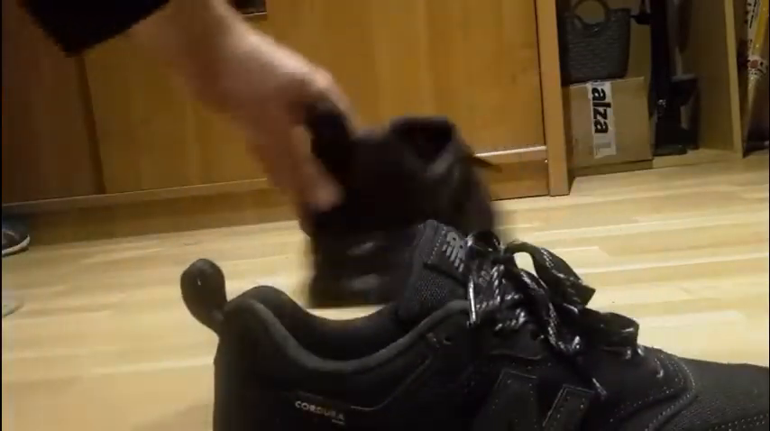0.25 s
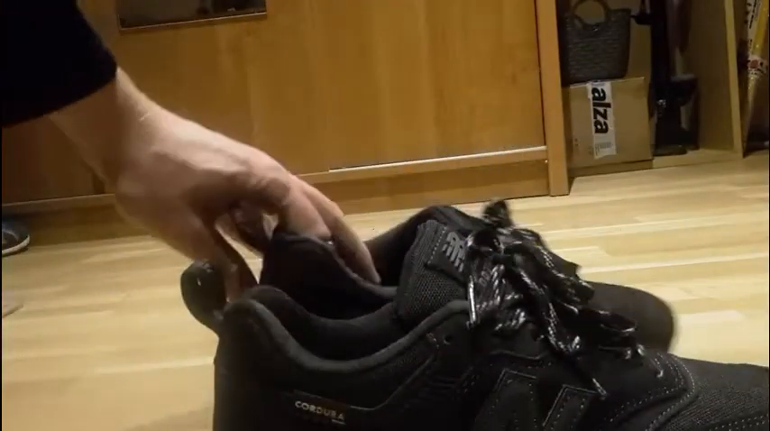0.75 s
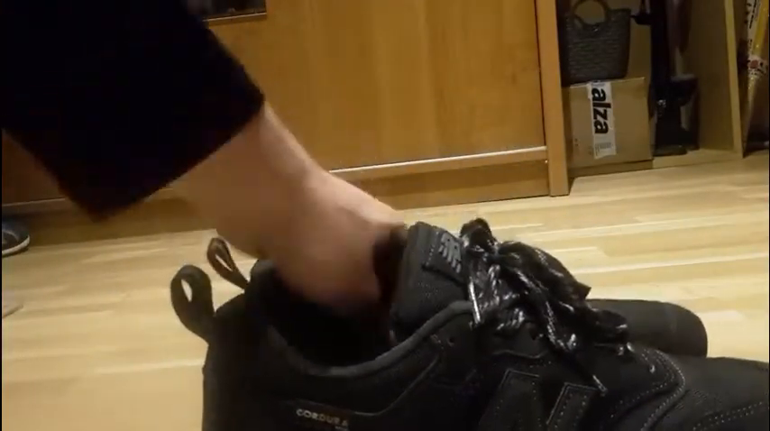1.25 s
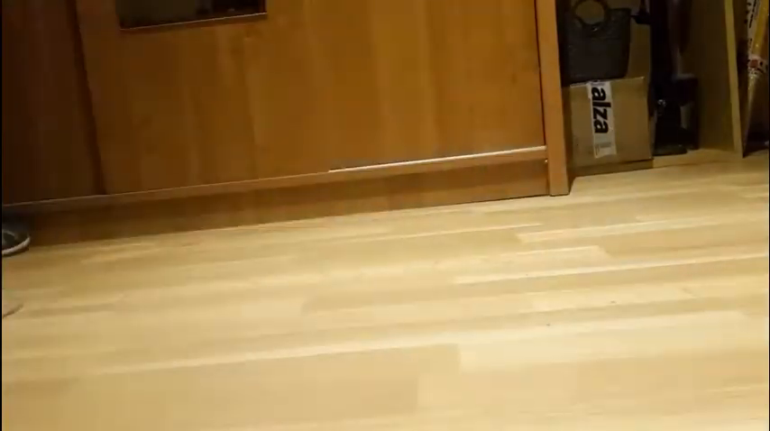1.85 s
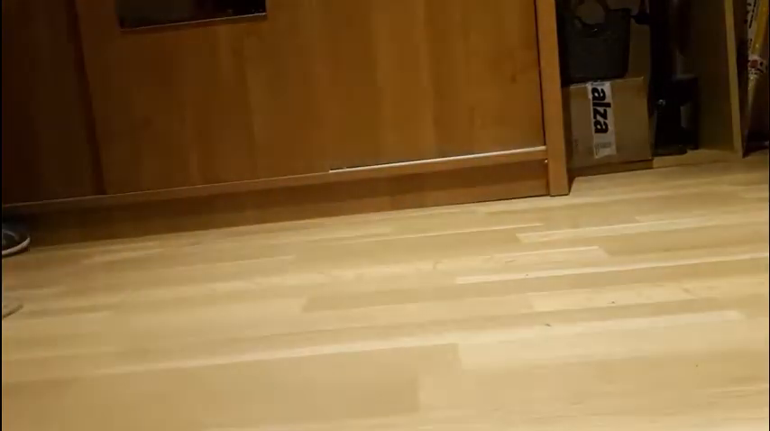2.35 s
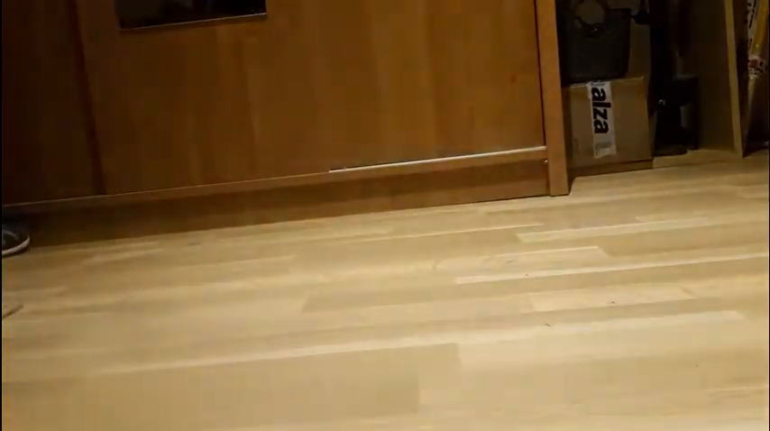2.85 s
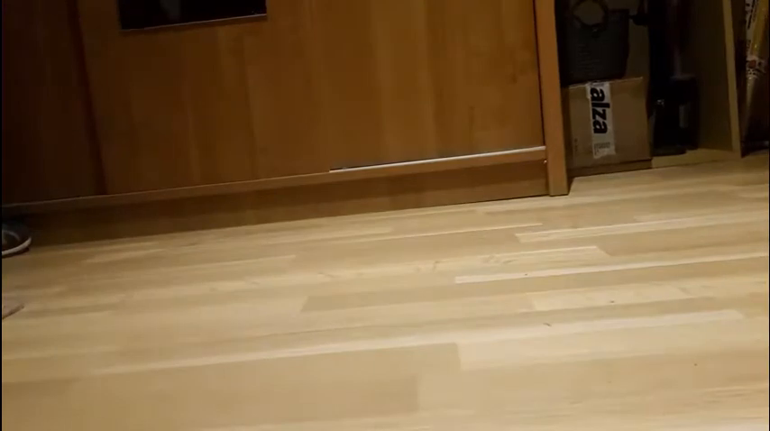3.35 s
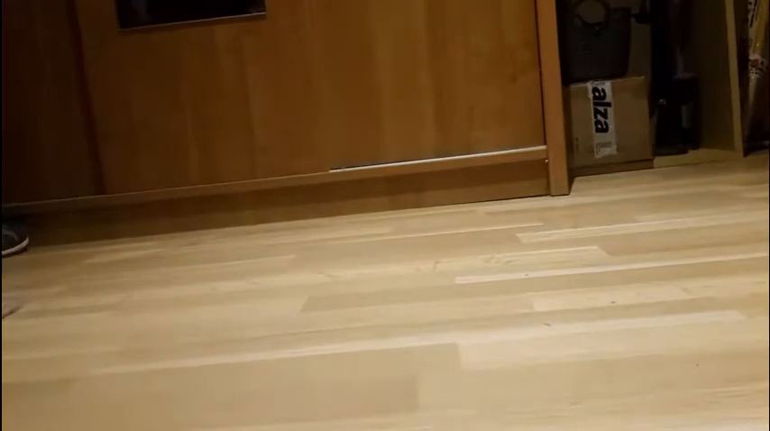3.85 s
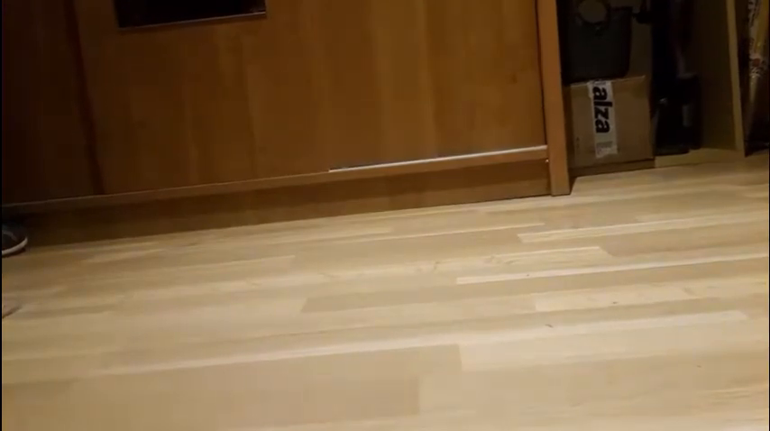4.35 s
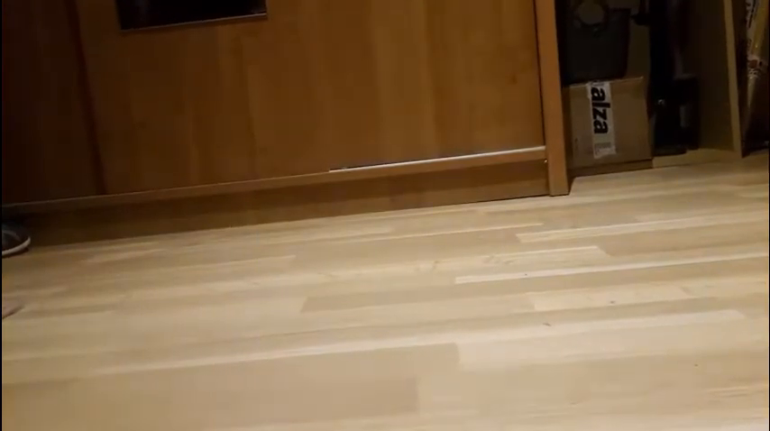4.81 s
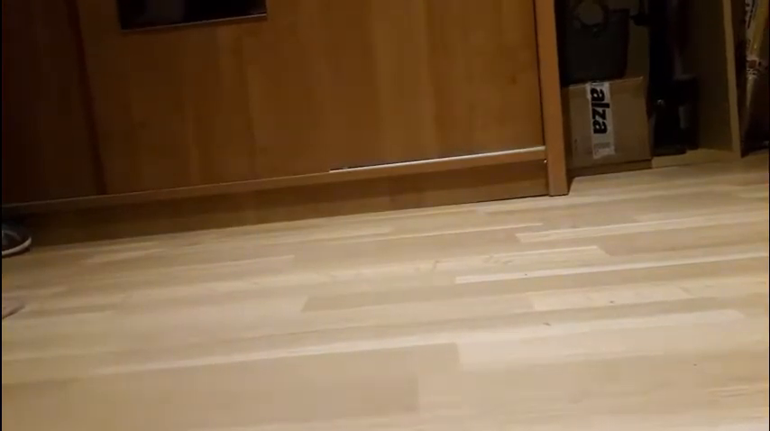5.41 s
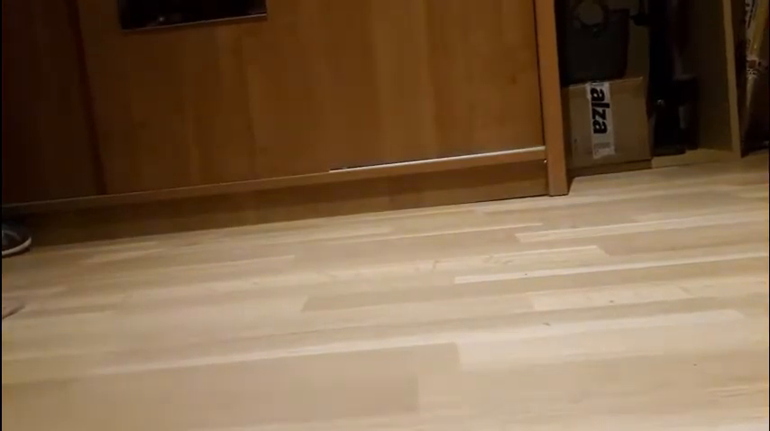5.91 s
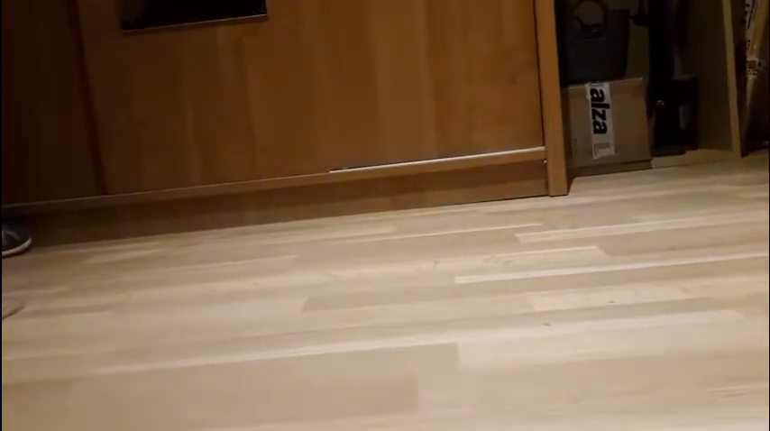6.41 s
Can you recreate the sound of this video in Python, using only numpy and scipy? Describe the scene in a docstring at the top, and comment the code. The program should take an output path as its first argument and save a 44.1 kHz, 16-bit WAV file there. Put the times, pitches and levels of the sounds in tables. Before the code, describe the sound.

In a small quiet wooden-floored room, a rubber-soled shoe is set down close to the microphones with dull knocks and short scuffs. Light fabric rubbing and tiny lace-tip ticks follow. Then a loud cluster of hard thuds lands on the boards to the left, with a few softer steps after it, clothes brushing, and a faint steady hiss underneath.

```python
"""In a small quiet room with a wooden floor, a shoe is set down in front and rocks on its sole.
Then blows and steps thud on the boards to the left; soles drag, cloth rustles and lace tips tick.
Knocks are dull pulses that ring the sole or the boards; scuffs, cloth and cracks are shaped noise.
The floor hums and shudders, reflections follow, and a close microphone pair adds a faint hiss."""
import sys
import numpy as np
from scipy import signal
from scipy.fft import rfft, irfft, next_fast_len
from scipy.io import wavfile
from scipy.ndimage import uniform_filter1d

SR = 44100
rng = np.random.default_rng(int(sys.argv[2]) if len(sys.argv) > 2 else 0)


def wav_record(signal):
    """Record a signal, one row per channel, as 16-bit PCM in the file named by sys.argv[1]."""
    frames = np.transpose(np.atleast_2d(signal))
    bounded = np.clip(frames, -1, 1)
    # unit amplitude maps onto the largest positive 16-bit level
    quanta = np.round(bounded * 32767).astype(np.int16)
    wavfile.write(sys.argv[1], SR, quanta)


N = 294191
TIME = np.arange(N) / SR   # seconds

# In all tables, left-right level is left minus right.
# Rubber sole touching the floor in front:
# (t/s, body peak level/dB, low edge f/Hz, top edge f/Hz, ring level re pulse/dB, crack level re body/dB)
SOLE_KNOCKS = [(0.5922, -13, 201, 815, -4, -20.5), (0.6568, -22.5, 207, 636, -13, -28),
               (0.7550, -37.5, 228, 554, -36, -28), (0.964, -38.5, 150, 560, -6, -24),
               (1.0722, -27.5, 350, 960, -24, -36), (1.0738, -17.5, 143, 400, -16, -34),
               (1.0935, -6, 230, 950, 11, -21.5), (1.2034, -11, 175, 653, -2, -25.5),
               (1.592, -43, 250, 684, -2, -26), (1.703, -37, 400, 1060, -8, -11),
               (1.961, -44.5, 700, 1700, -20, -19), (2.026, -41.5, 215, 540, -28, -19)]
# Heel and sole hitting the boards to the left in quick succession; same columns
BOARD_KNOCKS = [(2.8060, -5, 428, 1440, 8, -24), (2.8092, -7, 195, 420, 7, -26),
                (2.8118, -4.5, 252, 906, -15, -27.5), (2.8155, -24, 140, 420, 8, -37),
                (2.9135, -17.5, 337, 1070, -36, -19.5), (2.9174, -19.5, 340, 490, -4, -43),
                (3.5785, -26.5, 226, 1090, -6, -17), (3.5845, -27, 217, 484, 16, -19),
                (4.3310, -18, 586, 1350, -26, -21), (4.3335, -21, 516, 707, -11, -32),
                (4.6185, -31.5, 180, 463, 1, -17), (4.633, -37, 200, 820, 6, -23),
                (5.497, -41.5, 340, 456, 26, -32), (5.535, -48, 340, 470, 7, -29)]
# Ways the sole and the boards vibrate: (f/Hz, level/dB, t60/s)
SOLE_RESONANCES = [(246, 2.5, 0.026), (499, 8, 0.044), (710, -9, 0.039), (933, 7.5, 0.024)]
BOARD_RESONANCES = [(172.2, -11, 0.59), (268, 6.5, 0.029), (398, 8.5, 0.041), (490, -20, 0.017),
                    (580, 10.5, 0.027), (752, 17.5, 0.04), (1162, 8.5, 0.047)]
# Colour of the brief crack at contact: (f/Hz, level/dB)
CRACK_COLOUR = [(300, 10.5), (1200, 6), (3000, -2.5), (5500, -13.5), (7500, -17.5), (11000, -18),
                (16000, -22)]
# The two microphone ports colour the treble differently: (f/Hz, left-right level/dB)
TREBLE_BALANCE = [(1000, -2), (3000, -2), (5700, -8), (8000, 3.5), (12000, 1)]
# Soles rolling and dragging: (t/s, level before swell/dB, centre f/Hz, time to swell/s, left-right level/dB)
SOLE_SCUFFS = [(0.099, -59, 520, 0.0073, 4), (0.214, -56.5, 550, 0.0083, 4), (0.891, -54.5, 477, 0.012, 4),
               (1.056, -42, 505, .008, -2), (1.114, -37, 613, 0.0034, -4), (1.245, -38, 413, 0.0057, -4),
               (1.274, -41.5, 432, 0.0055, 5), (1.414, -54.5, 396, 0.0038, -2),
               (1.514, -49, 540, 0.0069, 1), (1.917, -59.5, 664, 0.019, -1), (1.957, -55, 1110, 0.0046, 12),
               (2.849, -32.5, 744, 0.0065, -11), (3.059, -44.5, 438, 0.0086, 4.5),
               (4.318, -52.5, 734, .01, 7), (4.345, -42.5, 680, 0.018, 1), (4.452, -49, 600, 0.0081, 6),
               (4.651, -51, 556, 0.005, -7), (4.778, -57, 455, 0.0075, -2), (4.971, -57.5, 430, 0.015, 0),
               (5.825, -54.5, 510, 0.013, 2)]
# Weight coming onto the floor: (t/s, peak level before panning/dB, time of push/s)
WEIGHT_SHIFTS = [(2.811, -40, 0.0042), (3.584, -43.5, 0.023), (3.8004, -32.5, 0.0069),
                 (3.819, -34.5, 0.0048)]
# Hum of the hollow floor: (f/Hz, level/dB, t60/s)
FLOOR_RESONANCES = [(177, 8.5, 0.23), (270, -14.5, 0.26), (383, -5, 0.11), (750, -19, 0.27)]
# Landings that shake the whole floor: (t/s, peak level before panning/dB, top edge f/Hz)
FLOOR_LANDINGS = [(1.096, -41, 200), (2.815, -30.5, 80), (3.068, -45, 165), (3.587, -38, 262),
                  (4.622, -47, 200)]
# Deep vibrations of the joists: (f/Hz, level/dB, t60/s)
JOIST_RESONANCES = [(31.8, 2, 0.031), (59.4, -5, 0.14), (87, -0.5, 0.28)]
# Lace tips: (t/s, ring peak level before panning/dB, left-right level/dB, snap level/dB)
TIP_TICKS = [(1.501, -51, -8, -59), (1.5324, -50, 0, -55), (1.9385, -60, 5, -55), (2.2245, -47, -4, -56),
             (2.2645, -39.5, -2, -50), (2.2724, -33.5, -4, -42), (2.558, -55, -5, -51),
             (3.341, -39.5, -13, -55), (3.4755, -53, -7.5, -58), (6.321, -48, -13, -59),
             (6.349, -38, -8, -58)]
# High ringing of a lace tip: (f/Hz, level/dB, t60/s)
TIP_RESONANCES = [(4040, -27.5, 0.0027), (5500, -22, 0.0043), (7200, -51, 0.0017)]
# The hand sliding over the shoe's upper: (t at mid-stroke/s, level before fabric gain/dB, length/s)
HAND_MOVES = [(0.34, -76, 0.15), (0.91, -72, 0.14), (1.085, -60.5, 0.1), (1.245, -58, 0.18),
              (1.5, -63.5, 0.1), (1.62, -73, 0.18), (1.97, -64, 0.089), (2.28, -69, 0.18)]
# Clothes brushing as the legs move; same columns
LEG_MOVES = [(3.39, -67, 0.41), (4.43, -59, 0.18), (4.67, -60.5, 0.15), (5.18, -66.5, 0.29),
             (5.555, -59, 0.12), (5.91, -62.5, 0.26), (6.33, -64.5, 0.19), (6.49, -64.5, 0.1)]
# Fabric shaken by a landing: (t/s, level before attack and fabric gain/dB)
SHAKES = [(0.61, -62), (2.807, -53.5), (2.915, -54.5), (3.578, -55), (3.805, -61.5)]
# Rubbing colour of the shoe's upper and of the clothes: (f/Hz, level/dB)
UPPER_COLOUR = [(100, 6.5), (450, 9.5), (1300, 5), (2500, 1), (4000, 1.5), (5800, -3.5), (7200, -12),
                (15000, -7.5)]
CLOTHES_COLOUR = [(100, 2), (450, 11), (1200, 6.5), (2500, 5), (4300, 2.5), (5700, 1.5), (7200, -7),
                  (11000, -1.5), (15000, -4)]
# Narrow treble resonance of the microphone, heard as a high zip on the rubbing: (f/Hz, level/dB, t60/s)
MIC_RESONANCES = [(1380, -29, 0.011), (3800, -20, 0.0076), (5950, 7, 0.0028)]
# Loudness of the reflections in each region: (f/Hz, level/dB)
ECHO_COLOUR = [(40, -45), (100, 11.5), (200, 3.5), (300, 0), (500, -0.5), (900, -2), (1600, 3), (5000, 3.5),
               (15000, -10)]
# How alike the reflections are on both sides: (f/Hz, likeness from -1 to 1)
ECHO_LIKENESS = [(100, 0.27), (400, 0.69), (900, 0.32), (1600, 0), (15000, 0.29)]
# How long the reflections last: (f/Hz, t60/s)
ECHO_T60 = [(60, 0.99), (170, 0.27), (500, 0.3), (1000, 0.26), (3000, 0.47), (12000, 0.069)]
# Colour of the steady air and hiss: (f/Hz, level/dB)
AIR_COLOUR = [(15, -57), (25, -44), (48, -10), (119, -1.5), (289, -4.5), (331, -4), (482, -5.5), (523, -5),
              (631, -5), (741, -5.5), (804, -5), (1300, -10.5), (6550, -22), (11800, -18), (15500, -18.5)]
# How alike that air is on both sides: (f/Hz, likeness from -1 to 1)
AIR_ALIKE = [(60, -0.03), (150, 0.036), (380, -0.032), (950, -0.083), (2380, 0.28), (5980, -0.44),
             (15000, 0.07)]
# Which side of the air is louder: (f/Hz, left-right level/dB)
AIR_SIDES = [(60, 0), (150, -11.5), (380, -10.5), (950, -8), (2380, -17.5), (5980, -7.5), (15000, -4.5)]

# seconds by which the left port leads: the shoe is slightly to the right, the boards to the left
SHOE_LEAD_S, BOARDS_LEAD_S = -0.00027, 0.00027
SETTLE_ATTACK_S, SETTLE_T60_S = 0.0097, 0.73
ROOM_BUILD_S = 0.006
AIR_DB = -55   # rms level
CUTOFF_HZ = 15650


def from_db(db):
    """Turn decibels into a plain multiplier."""
    return 10 ** (np.asarray(db) / 20)


def rms_one(x):
    """Scale a sound to an rms of 1."""
    return x / np.sqrt(np.mean(x ** 2) + 1e-20)


def peak_one(x):
    """Scale a sound to a peak of 1."""
    return x / (np.abs(x).max() + 1e-20)


def at_hz(points, hz):
    """Read a table between its points, on a log-frequency axis."""
    table = np.array(points)
    return np.interp(np.log(np.maximum(hz, 1)), np.log(table[:, 0]), table[:, 1])


def cut(x, hz, kind, order):
    """Keep the lows ("low") or the highs ("high") of a sound."""
    edge_hz = np.clip(hz, 10, 0.45 * SR)
    return signal.sosfilt(signal.butter(order, edge_hz, kind, fs=SR, output="sos"), x)


def add(track, s, sound):
    """Mix a sound in at a moment."""
    start = max(round(s * SR), 0)
    track[start:start + len(sound)] += sound[:N - start]


def ring(push, modes):
    """A push sets off vibrations that each die away at their own pace."""
    t = TIME[:SR // 2]
    response = sum(from_db(db - 60 * t / t60) * np.cos(2 * np.pi * hz * t) for hz, db, t60 in modes)
    return signal.oaconvolve(push, response)[:len(push)]


def noise(spectrum, size, likeness=((1, 0),), balance=((1, 0),)):
    """Stereo noise with a colour, a left-right likeness and a balance; rms 1."""
    padded = next_fast_len(size)
    hz = np.fft.rfftfreq(padded, 1 / SR)
    mid, side = rfft(rng.standard_normal((2, padded)))
    alike = np.clip(at_hz(likeness, hz), -1, 1)
    sides = np.array([[1], [-1]])
    # more of the shared part makes left and right more alike
    pair = np.sqrt(1 + alike) * mid + sides * np.sqrt(1 - alike) * side
    gain = from_db(at_hz(spectrum, hz) + sides * at_hz(balance, hz) / 2)
    return rms_one(irfft(pair * gain, padded)[:, :size])


def knocks(rows, modes, lead_s, crack_t60):
    """A soft contact pushes out one dull pulse, rings the body and gives a brief crack."""
    out, size = np.zeros((2, N)), SR // 2
    for s, db, low_hz, top_hz, ring_db, crack_db in rows:
        # a softer contact has a lower top edge
        push = cut(signal.unit_impulse(size) + 1e-18, top_hz, "low", order=7)
        # slow pressure leaks round a small contact patch
        pulse = peak_one(cut(push, low_hz, "high", order=2))
        body = -peak_one(pulse + from_db(ring_db) * peak_one(ring(pulse, modes)))
        fade = from_db(crack_db - 60 * TIME[:size] / crack_t60)
        crack = fade * noise(CRACK_COLOUR, size, balance=TREBLE_BALANCE)
        add(out[0], s - lead_s / 2, from_db(db) * (body + crack[0]))
        add(out[1], s + lead_s / 2, from_db(db) * (body + crack[1]))
    return out


def scuffs(spread):
    """Tread blocks touch one after another, merging into a short dull swell."""
    out, size = np.zeros((2, N)), SR // 4
    for s, db, hz, swell_s, pan_db in SOLE_SCUFFS:
        dull = cut(rng.standard_normal(size), hz * spread, "low", order=4)
        tread = rms_one(cut(dull, hz / spread, "high", order=2))
        age = TIME[:size] / swell_s
        swell = age * np.exp(1 - age)   # fullest at age 1
        for channel, side in enumerate((1, -1)):
            add(out[channel], s, from_db(db + side * pan_db / 2) * tread * swell)
    return out


def floor_boom(pan_db):
    """Weight comes on gradually, so the hollow floor swells and then hums out."""
    out, size = np.zeros(N), SR
    hum = ring(signal.unit_impulse(size), FLOOR_RESONANCES)
    for s, db, push_s in WEIGHT_SHIFTS:
        swell = 1 - np.exp(-2 * TIME[:size] / push_s)
        add(out, s, from_db(db) * peak_one(hum * swell))
    return out * from_db([[pan_db / 2], [-pan_db / 2]])


def floor_thuds(pan_db):
    """A softened push sets the joists into a deep, quickly damped shudder."""
    out = np.zeros(N)
    for s, db, top_hz in FLOOR_LANDINGS:
        push = cut(signal.unit_impulse(SR) + 1e-18, top_hz, "low", order=2)
        add(out, s, from_db(db) * peak_one(ring(push, JOIST_RESONANCES)))
    return out * from_db([[pan_db / 2], [-pan_db / 2]])


def lace_ticks(scuff_t60):
    """Each hard tip scuffs for an instant, which gives a high ring and a thin snap."""
    out, size = np.zeros((2, N)), SR // 20
    for s, db, pan_db, snap_db in TIP_TICKS:
        fade = from_db(-60 * TIME[:size] / scuff_t60)
        scuff = fade * noise([(1, 0)], size, balance=TREBLE_BALANCE)
        for channel, side in enumerate((1, -1)):
            tip = from_db(db + side * pan_db / 2) * peak_one(ring(scuff[channel], TIP_RESONANCES))
            snap = from_db(snap_db) * cut(scuff[channel], 5200, "high", order=2)
            add(out[channel], s, tip + snap)
    return out


def rubbing(speed, spectrum, level_db, zip_db, grain_db):
    """Fabric slides in many tiny catches; the microphone's treble resonance adds a high zip."""
    catches = rms_one(uniform_filter1d(rng.standard_normal(N), size=200))   # size in samples
    hiss = noise(spectrum, N, ECHO_LIKENESS, TREBLE_BALANCE)
    high_zip = rms_one(np.array([ring(channel, MIC_RESONANCES) for channel in hiss]))
    rustle = from_db(level_db) * hiss + from_db(zip_db) * high_zip
    return speed * from_db(grain_db * catches) * rustle


def stroking(rows):
    """Each stroke speeds up and slows down in a bell shape; overlapping strokes add in power."""
    power = np.zeros(N)
    for s, db, length_s in rows:
        power += (from_db(db) / np.cosh(np.pi * (TIME - s) / length_s)) ** 2
    return np.sqrt(power)


def settling(rows):
    """A landing jolts the fabric into motion, which then dies away."""
    power = np.zeros(N)
    for s, db in rows:
        age = np.maximum(TIME - s, 0)
        attack = 1 - np.exp(-age / SETTLE_ATTACK_S)
        power += (from_db(db - 60 * age / SETTLE_T60_S) * attack) ** 2
    return np.sqrt(power)


def room(x, wet_db):
    """Reflections thicken within milliseconds and die away octave by octave."""
    size = SR
    t = TIME[:size]
    spectrum = rfft(noise([(1, 0)], size, ECHO_LIKENESS))
    hz = np.fft.rfftfreq(size, 1 / SR)
    tail = np.zeros((2, size))
    build = 1 - np.exp(-(t / ROOM_BUILD_S) ** 2)
    for low in 30 * 2.0 ** np.arange(10):   # lower edge of each octave, Hz
        centre = low * np.sqrt(2)
        inside = (hz >= low) & (hz < 2 * low)
        band = irfft(spectrum * inside, size) * from_db(-60 * t / at_hz(ECHO_T60, centre)) * build
        share = np.sqrt(inside.mean() / size)   # wider octaves hold more energy
        tail += rms_one(band) * share * from_db(at_hz(ECHO_COLOUR, centre))
    # the left channel alone feeds both sides
    return from_db(wet_db) * signal.fftconvolve(x[:1], tail, axes=1)[:, :N]


def still_air():
    """Steady coloured noise makes the quiet air and the microphones' faint hiss."""
    return from_db(AIR_DB) * noise(AIR_COLOUR, N, AIR_ALIKE, AIR_SIDES)


def scene():
    """Near shoe, farther blows, floor, small handling sounds, reflections and still air."""
    near = knocks(SOLE_KNOCKS, SOLE_RESONANCES, SHOE_LEAD_S, crack_t60=0.03) + scuffs(spread=1.23)
    far = knocks(BOARD_KNOCKS, BOARD_RESONANCES, BOARDS_LEAD_S, crack_t60=0.058)
    floor = floor_boom(pan_db=6.5) + floor_thuds(pan_db=8.5)
    ticks = lace_ticks(scuff_t60=0.021)
    hand = rubbing(stroking(HAND_MOVES), UPPER_COLOUR, level_db=9.0, zip_db=-5.5, grain_db=2.5)
    clothes = rubbing(stroking(LEG_MOVES), CLOTHES_COLOUR, level_db=4.5, zip_db=-18.5, grain_db=2.1)
    shaken = rubbing(settling(SHAKES), CLOTHES_COLOUR, level_db=8.0, zip_db=-26.0, grain_db=0.8)
    echoes = room(near, wet_db=-7.0) + room(far, wet_db=-5.5) + room(ticks, wet_db=-5)
    return near + far + floor + ticks + hand + clothes + shaken + echoes + still_air()


def record(dry):
    """The highest treble is cut off steeply."""
    # ripple 0.2 dB below the cutoff, at least 70 dB down above it
    return signal.sosfilt(signal.ellip(10, 0.2, 70, CUTOFF_HZ, fs=SR, output="sos"), dry)


dry = scene()
out = record(dry)
wav_record(out)
```